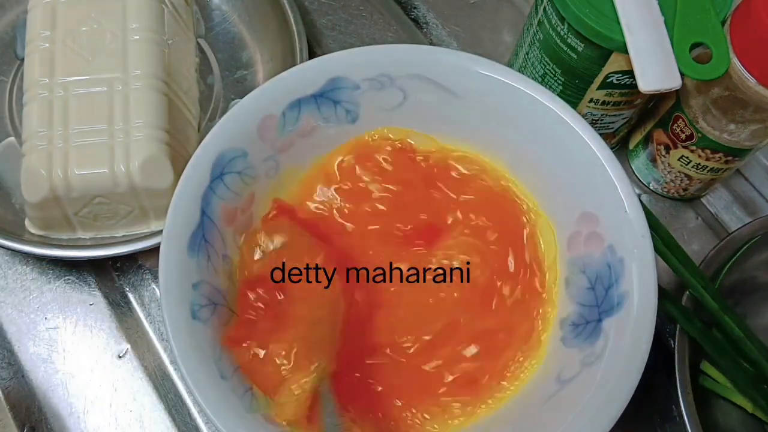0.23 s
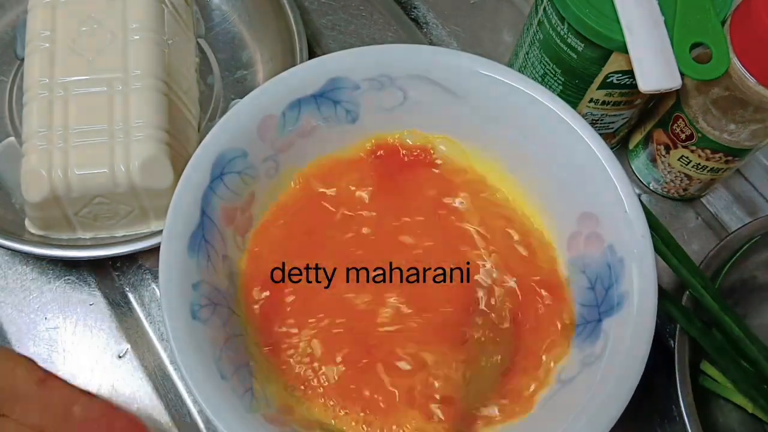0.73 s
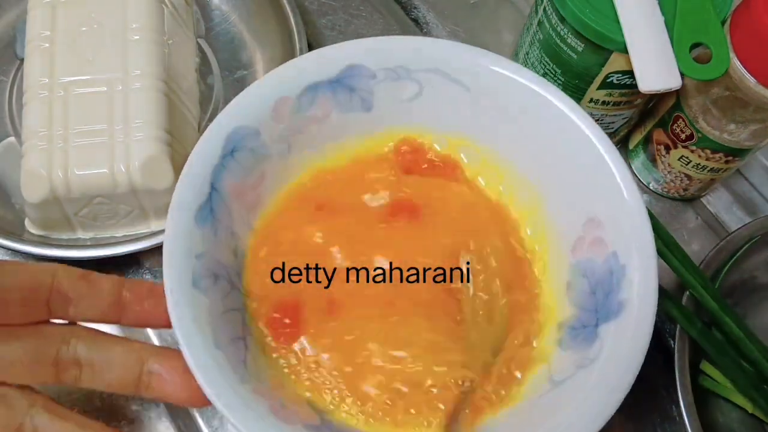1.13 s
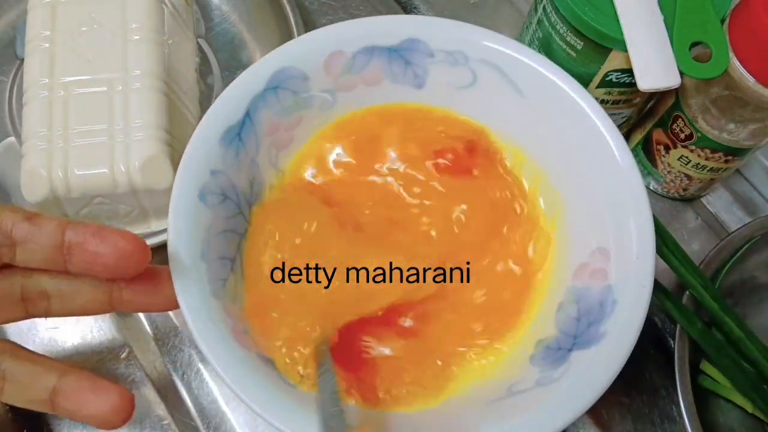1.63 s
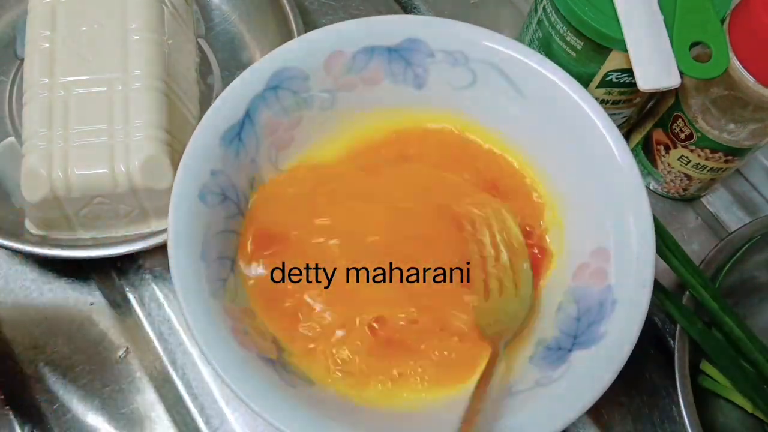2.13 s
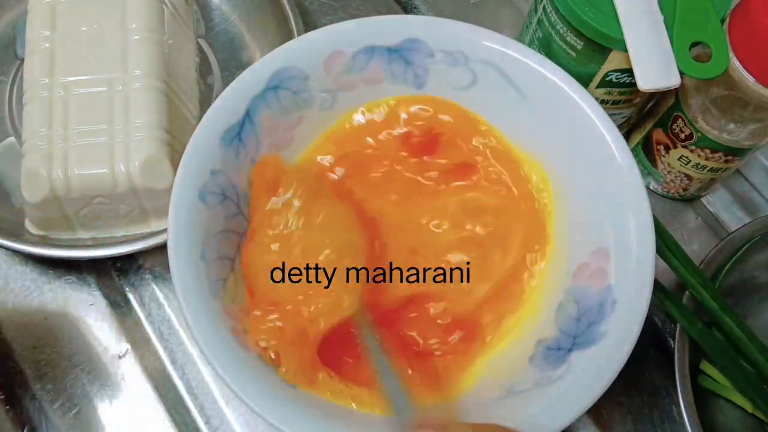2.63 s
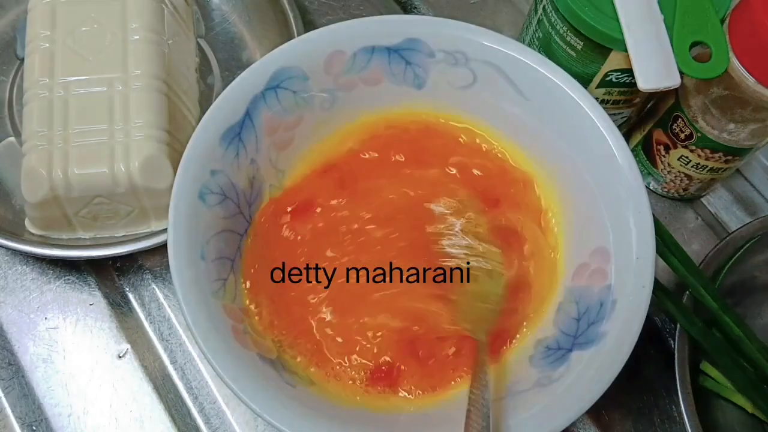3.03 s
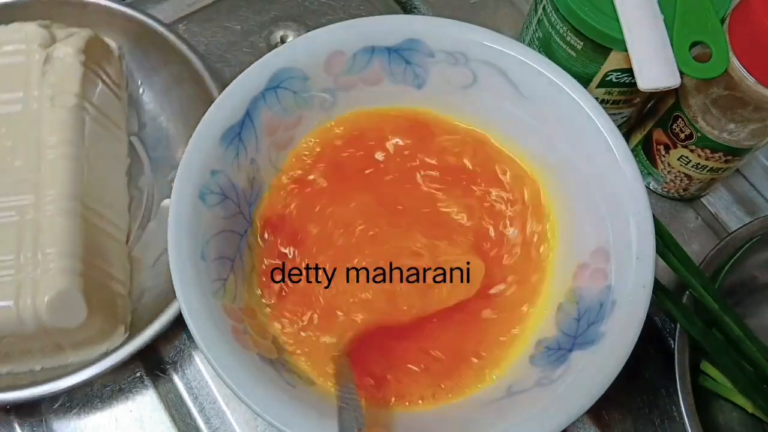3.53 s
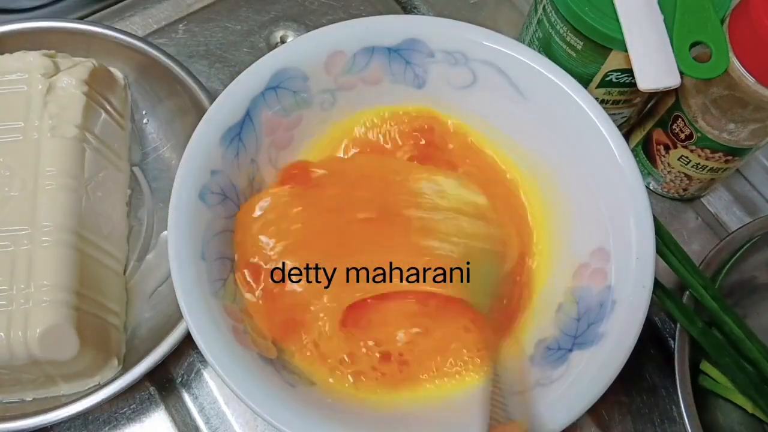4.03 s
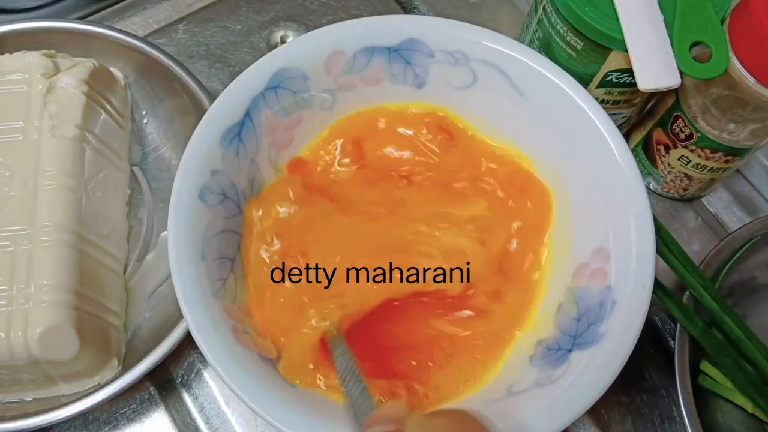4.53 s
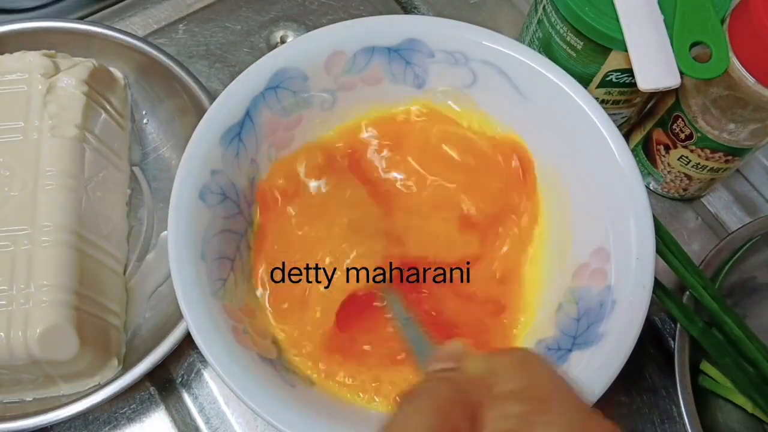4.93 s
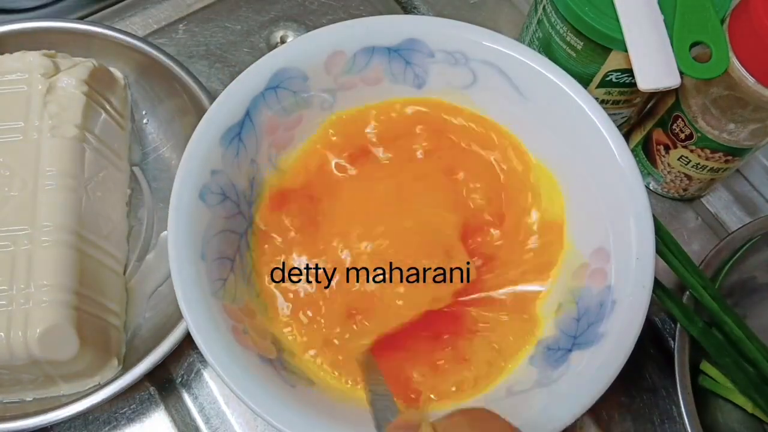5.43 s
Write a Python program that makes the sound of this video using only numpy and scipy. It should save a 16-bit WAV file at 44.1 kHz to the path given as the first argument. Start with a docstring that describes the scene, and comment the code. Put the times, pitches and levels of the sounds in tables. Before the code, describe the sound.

Raw eggs are beaten with a metal fork in a ceramic bowl, heard closely in mono in a small kitchen with short reflections. The first 0.4 s is soft squelching and faint taps; a strong wet knock with a hollow plop lands at 0.5 s, another at 0.7 s. From about 1 to 1.7 s the strokes become light and quiet. By 1.9 s the beating builds to around five hard strokes a second, each a damped mid-pitched knock with thin metallic ticks and short ceramic ring, followed about 45 ms later by a slap and descending gulps. A gap near 3.2-3.4 s breaks the run. Tines drag at 3.5 and 3.7 s, then sharper clacks, pops and dense squelching continue, with less airy hiss after strokes. A sharp pop comes at 5.4 s; beating continues to the end near 5.7 s. Soft low counter thuds and faint background hiss lie underneath.

```python
"""A fork beats raw eggs in a ceramic bowl on a steel sink top, about five strokes a second.
It starts softly, beats harder, eases off around 1 to 1.7 s, then beats hard; late on, the hiss after strokes is quieter.
In each stroke the fork knocks on the egg-damped wall and its tines tick, from noise pushes and gliding notes.
Flung egg then often slaps back and gulps; short swelling notes plop or fill out a hit, and tines at times drag.
Bubble notes squelch and fizz with the vigour, filtered noise thuds in the counter, a small kitchen answers."""
import sys
import numpy as np
from scipy import signal
from scipy.fft import rfft, irfft
from scipy.io import wavfile
from scipy.ndimage import uniform_filter1d

SR = 44100
rng = np.random.default_rng(int(sys.argv[2]) if len(sys.argv) > 2 else 0)


def store_wav(level_fs):
    """Save 16-bit WAV to argv[1]."""
    pcm = np.round(np.clip(np.atleast_2d(level_fs), -1, 1) * 32767)
    wavfile.write(sys.argv[1], SR, pcm.T.astype(np.int16))


N = 251370  # length [samples]

# modes of the bowl, the fork and the sink top: (frequency [Hz], level [dB])
RING = [(958, -4), (1011, -1), (1070, -2), (1156, -2), (1295, -5), (1420, -5), (1481, 0), (1533, 2),
        (1597, -2), (1683, -3), (1741, -2), (1808, -2), (1971, -1), (2104, -2), (2242, -5), (2564, -3),
        (2930, -5), (4618, 1), (4800, -3), (6090, -4), (6670, -1)]
# colour of the sharp clack of a hit: (frequency [Hz], level [dB])
CLACK = [(1500, -17.5), (2200, 7), (2570, 8), (3100, 3), (3600, -7.5), (4200, -18), (5500, -25.5)]
# colour of the fork's tines: (frequency [Hz], level [dB])
TINES = [(2500, -24.5), (3900, -12.5), (4680, 1.5), (5400, -6.5), (6100, -1), (6620, 1), (7050, -6),
         (7700, -10), (8500, -19.5), (9500, -24), (10200, -17.5), (11500, -39.5), (13800, -40),
         (15300, -27.5)]
# the fork meets the bowl: (time [s], wall knock level [dB], knock pitch [Hz], hollow bowl note level [dB],
# sharp clack level [dB], tine tick level [dB], tick pitch [Hz])
STROKES = [(0.004, -50, 1450, -66, -54.5, -58.5, 6300), (0.2862, -57, 1150, -54, -68, -56.5, 5200),
           (0.3228, -40, 1810, -50, -52, -48, 5680), (0.514, -19.5, 1650, -39, -49, -38.5, 4570),
           (0.7246, -30, 1693, -51.5, -49, -46, 5960), (0.9207, -38.5, 1510, -60, -62, -58, 5060),
           (1.118, -40, 1735, -49.5, -61, -51, 5400), (1.3399, -40, 1480, -56.5, -70, -62.5, 5670),
           (1.529, -52.5, 1440, -62.5, -71, -68.5, 6550), (1.7244, -33.5, 1590, -48.5, -61, -45.5, 6540),
           (1.9269, -24.5, 1653, -41.5, -54, -43, 6380), (2.1292, -20, 1567, -41.5, -59, -35.5, 5020),
           (2.3302, -26, 1320, -35.5, -39.5, -28.5, 5460), (2.53, -22, 1530, -42, -30, -39.5, 5870),
           (2.7164, -22, 1906, -40.5, -34, -27.5, 6500), (2.9003, -22, 1760, -25, -26.5, -29.5, 6820),
           (3.0915, -31.5, 1430, -33, -36.5, -43, 6300), (3.4842, -23.5, 1490, -24.5, -42.5, -40.5, 6530),
           (3.6784, -22.5, 1626, -29.5, -34.5, -41, 6500), (3.7844, -25, 1200, -51, -29, -36.5, 4590),
           (3.8081, -27, 2040, -25, -33.5, -55, 4200), (4.0774, -17.5, 1565, -26, -39, -52.5, 6600),
           (4.2889, -18.5, 1710, -56, -29, -36, 5200), (4.4797, -24.5, 1730, -37, -32.5, -27, 4570),
           (4.677, -25.5, 1600, -37, -30.5, -35.5, 4320), (4.8501, -24.5, 1774, -43.5, -28.5, -32.5, 6660),
           (5.0399, -20, 1590, -44, -37.5, -38, 5960), (5.3987, -26.5, 1790, -42.5, -47, -48, 6100),
           (5.5927, -31.5, 1660, -42.5, -47, -40, 5950)]

RING_T60 = 0.2  # seconds for the ringing to fall by 60 dB
TAIL_T = np.arange(int(0.35 * SR)) / SR
BINS = np.fft.rfftfreq(2048, 1 / SR)  # frequencies of the short pulses [Hz]


def amp(db):
    """Turns decibels into a linear gain."""
    return 10 ** (np.asarray(db) / 20)


# one decaying complex wave for each mode
RING_WAVES = np.array([amp(db - 60 * TAIL_T / RING_T60) * np.exp(2j * np.pi * hz * TAIL_T)
                       for hz, db in RING])


def unit(x):
    """Scales to rms 1."""
    return x / np.sqrt(np.mean(x ** 2) + 1e-20)


def at_level(x, db):
    """Sets the rms of the first 30 ms of a blow."""
    start = x[:int(0.03 * SR)]
    return amp(db) * x / np.sqrt(np.mean(start ** 2) + 1e-20)


def add(mix, s, sound):
    """Lays a sound into the mix at s seconds, cut off at the end of the mix."""
    part = mix[max(round(s * SR), 0):][:len(sound)]
    part += sound[:len(part)]


def read(points, hz):
    """A spectrum joined by straight lines on a log-frequency axis."""
    f, db = np.transpose(points)
    return np.interp(np.log(hz + 1), np.log(f), db)


def band(points):
    """A spectrum on BINS that falls by a further 30 dB per octave beyond its end points."""
    hz = BINS + 20
    octaves_below = np.maximum(np.log2(points[0][0] / hz), 0)
    octaves_above = np.maximum(np.log2(hz / points[-1][0]), 0)
    return np.maximum(read(points, BINS) - 30 * (octaves_below + octaves_above), -110)


def click(db):
    """The shortest causal (minimum-phase) pulse that has the given spectrum on BINS."""
    log_gain = np.log(amp(np.r_[db, db[-2:0:-1]]))
    return np.fft.ifft(np.exp(np.conj(signal.hilbert(log_gain)))).real


def tint(x, points):
    """Colours a long sound; rms 1."""
    gain = amp(read(points, np.fft.rfftfreq(N, 1 / SR)))
    return unit(irfft(rfft(x) * gain, N))


def kitchen(wet_db, ring_db, hold=0.021, t60=0.13, late_db=-29, late_t60=0.16, gap=0.00089):
    """Direct sound, close reflections that hold briefly and die, and the ring of bowl and sink top."""
    early_fade = amp(-60 * np.maximum(TAIL_T - hold, 0) / t60)
    late_fade = amp(late_db - 60 * TAIL_T / late_t60)
    onset = np.clip(TAIL_T / gap - 0.5, 0, 1)
    tail = rng.standard_normal(len(TAIL_T)) * (early_fade + late_fade) * onset
    # each response draws random phases and nearly equal levels for the modes
    shares = rng.uniform(0.94, 1.0, len(RING)) * np.exp(2j * np.pi * rng.random(len(RING)))
    ring = (shares @ RING_WAVES).real
    response = amp(wet_db) * tail / np.linalg.norm(tail) + amp(ring_db) * ring / np.linalg.norm(ring)
    response[0] += 1  # the direct sound
    return response


def heard(sound, room, db):
    """A blow in the room, set to the rms of its first 30 ms."""
    return at_level(signal.fftconvolve(sound, room), db)


def hump(time):
    """A level that swells to 1 after the given time and dies away."""
    u = np.arange(int(0.4 * SR)) / SR / time
    return u * np.exp(1 - u)


def pocket(hz, swell, glide):
    """A short note that swells and bends upward, as air trapped in the egg does."""
    u = np.arange(int(8 * swell * SR)) / SR / swell
    turns = np.cumsum(hz * (1 + glide * np.tanh(u - 1))) / SR
    return (u * np.exp(1 - u)) ** 2 * np.sin(2 * np.pi * turns)


def bubbles(per_s, low_hz, high_hz, cycles, ring_db, count=30):
    """Tiny bubbles and snapping films of many sizes, a few of them large; each swells over some cycles."""
    spread_db = 3.8  # scale of the random rise in level
    out = np.zeros(N)
    for hz in np.geomspace(low_hz, high_hz, count):
        note = hz * pocket(hz, cycles / hz, glide=0.061)
        births = rng.integers(0, N, (round(per_s * N / SR / count), 1))
        size = amp(spread_db * np.minimum(rng.exponential(1, births.shape), 4))
        places = births + np.arange(len(note))
        out += np.bincount(places.ravel(), (size * note).ravel(), N)[:N]
    return unit(signal.fftconvolve(out, kitchen(wet_db=-0.5, ring_db=ring_db))[:N])


def vigour():
    """How hard the egg is stirred at every sample, in dB."""
    # pace of the beating: (time [s], level against the usual pace [dB])
    pace = [(0, 2), (0.28, -10.5), (0.62, 7), (0.82, -0.5), (1.05, -11.5), (1.43, -6), (1.68, -25.5),
            (1.88, -6.5), (2.1, -0.5), (3.1, 2), (3.45, -13.5), (3.56, 3.5), (3.85, 4.5), (4.03, -2),
            (4.5, 3.5), (4.88, 10), (5.32, -2.5), (5.7, 1.5)]
    return np.interp(np.arange(N) / SR, *np.transpose(pace))


def hiss():
    """Steady faint background noise, coloured."""
    # colour of the noise: (frequency [Hz], level [dB])
    noise_colour = [(30, -3.5), (110, -8.5), (250, -7), (700, 4.5), (1800, -13.5), (3700, -18.5),
                    (6000, -2), (8200, -28), (13800, -20.5), (14600, -9), (15600, -2.5)]
    return amp(-72.5) * tint(rng.standard_normal(N), noise_colour)


def counter():
    """The rocking bowl makes the sink top rumble; each stroke adds the power of a soft thud."""
    # colour of the sink top: (frequency [Hz], level [dB])
    counter_colour = [(20, -32), (45, -13.5), (70, -5.5), (87, -3), (108, 4.5), (135, -4), (160, -2),
                      (185, -7.5), (240, -14), (400, -14), (900, -51)]
    # course of the rumble: (time [s], level [dB])
    rumble_course = [(0.0, -56), (0.32, -58.5), (0.65, -49.5), (1.68, -67.5), (1.79, -50), (3.06, -49),
                     (3.13, -47.5), (3.41, -64.5), (3.49, -50.5), (4.98, -49.5), (5.14, -44.5), (5.36, -57),
                     (5.41, -49.5), (5.7, -50.5)]
    rumble_db = -1.5  # rumble between thuds, against that course
    thud_db, thud_swell_s = 3.5, 0.041  # thud against the rumble, time to its top
    power = np.ones(N)
    for s, *_ in STROKES:
        add(power, s, (amp(thud_db) * hump(thud_swell_s)) ** 2)
    level = amp(rumble_db + np.interp(np.arange(N) / SR, *np.transpose(rumble_course)))
    return tint(rng.standard_normal(N), counter_colour) * level * np.sqrt(power)


def spray():
    """Tiny droplets and bursting froth hiss just after each stroke."""
    # colour of the spray: (frequency [Hz], level [dB])
    spray_colour = [(7000, -20), (9000, 6), (10300, -8.5), (11700, -9), (13800, -6), (14700, 6),
                    (15600, 5.5)]
    base_db, follow, swell_s = -44.5, 0.61, 0.032  # level for a 0 dB tick, dB per dB of tick, time to top
    # the hiss after a stroke is louder where its tick is higher
    db_per_octave, tick_ref_hz = 13, 5600
    late_s, late_db = 3.6, -10  # from here on the hiss after each stroke is quieter
    level = np.zeros(N)
    for s, *_, tick_db, tick_hz in STROKES:
        db = base_db + follow * tick_db + db_per_octave * np.log2(tick_hz / tick_ref_hz)
        if s > late_s:
            db += late_db
        add(level, s, amp(db) * hump(swell_s) ** 2)
    froth = bubbles(per_s=4000, low_hz=8000, high_hz=15000, cycles=1.5, ring_db=-30, count=10)
    return level * tint(froth, spray_colour)


def churn():
    """Hard beating folds in larger bubbles, which gurgle between the strokes and set the bowl ringing."""
    # colour of the gurgle: (frequency [Hz], level [dB])
    churn_colour = [(700, -22), (1100, 6), (1600, 1.5), (1900, -3.5), (2600, -11.5), (4000, -35.5)]
    churn_db, follow = -57.5, 1.8  # level at the usual pace, dB per dB of vigour
    gurgle = bubbles(per_s=400, low_hz=950, high_hz=2300, cycles=4, ring_db=-2, count=14)
    return tint(gurgle, churn_colour) * amp(churn_db + follow * vigour())


def egg():
    """The stirred egg squelches and fizzes with the vigour of the beating, and surges at each stroke."""
    # colours of the low squelch and the high fizz: (frequency [Hz], level [dB])
    squelch_colour = [(150, -27), (300, -4), (480, 0), (570, 4), (660, 4.5), (820, -1), (1150, -4),
                      (1600, -8), (2100, -5), (2500, -13.5), (3100, -3), (4500, -34.5)]
    fizz_colour = [(2000, -12.5), (3000, -0.5), (3700, 5), (4700, 3.5), (6600, 0), (8000, -9.5),
                   (11000, -42), (15000, -52.5)]
    surge_lag_s, surge_width_s = 0.0079, 0.038  # the egg moves fastest around each stroke
    squelch_db, squelch_surge_db = -51.5, 5.5  # level at the usual pace, lift at each stroke
    fizz_db, fizz_follow, fizz_surge_db = -67.5, 0.92, 2.5  # level, dB per dB of vigour, lift at each stroke
    ring_db = -12  # how much the stirring sets the bowl ringing
    t = np.arange(N) / SR
    surge = sum(np.maximum(1 - ((t - s - surge_lag_s) / surge_width_s) ** 2, 0) for s, *_ in STROKES)
    low = bubbles(per_s=800, low_hz=230, high_hz=2700, cycles=2.5, ring_db=ring_db)
    high = bubbles(per_s=2500, low_hz=2200, high_hz=13000, cycles=1.8, ring_db=ring_db)
    squelch_level = amp(squelch_db + vigour() + squelch_surge_db * surge)
    fizz_level = amp(fizz_db + fizz_follow * vigour() + fizz_surge_db * surge)
    return tint(low, squelch_colour) * squelch_level + tint(high, fizz_colour) * fizz_level


def scrapes():
    """Dragged tines catch on the glaze in a dense run of tiny slips."""
    # the tines drag over the glaze: (start [s], length [s], level [dB])
    drags = [(0.536, 0.057, -44), (3.486, 0.18, -44), (3.692, 0.17, -43), (4.885, 0.064, -54),
             (5.028, 0.091, -46.5), (5.202, 0.049, -58.5)]
    # colour of the scrape: (frequency [Hz], level [dB])
    scrape_colour = [(2000, -4.5), (3000, 8.5), (3600, -6.5), (4050, 5.5), (4500, -4.5), (5500, 1),
                     (6600, 0), (8000, -9), (11000, -37.5), (15000, -46.5)]
    rise_s, fade_db_per_s, release_s = 0.0079, 34, 0.01
    slips_per_s = 450
    t = np.arange(int(0.4 * SR)) / SR
    pressure = np.zeros(N)
    for s, length, db in drags:
        rise = np.minimum(t / rise_s, 1)
        release = np.exp(-np.maximum(t - length, 0) / release_s)
        add(pressure, s, rise * amp(db - fade_db_per_s * t) * release)
    slips = rng.standard_normal(N) * (rng.random(N) < slips_per_s / SR)
    in_room = signal.fftconvolve(slips, kitchen(wet_db=7.5, ring_db=-17))[:N]
    return pressure * tint(in_room, scrape_colour)


def plop(db, hz, swell):
    """A swelling note whose level wobbles slowly at random."""
    note = pocket(hz, swell, glide=0.035)
    smooth = uniform_filter1d(rng.standard_normal(len(note)), size=350)
    wobble = unit(uniform_filter1d(smooth, size=350))
    room = kitchen(wet_db=-3.5, ring_db=-25.0)
    return amp(db) * signal.fftconvolve(note * (1 + 0.3 * wobble), room)


def plops():
    """Short swelling notes, some alone and some giving body or a sharp pop to a hit."""
    # swelling notes: (time [s], level before wobble and room [dB], pitch [Hz], swell time [s])
    plop_notes = [(0.18, -37.5, 637, .01), (0.292, -38, 530, 0.011), (0.3, -41, 874, 0.012),
                  (0.332, -32, 895, 0.007), (0.479, -16, 561, 0.012), (0.487, -36, 870, .007),
                  (0.84, -43, 553, 0.01), (1.342, -41.5, 635, 0.014), (1.787, -35, 955, 0.0068),
                  (1.834, -38, 644, 0.0056), (1.984, -24.5, 714, .0052), (2.029, -26, 447, 0.0047),
                  (2.03, -23.5, 704, 0.0048), (2.177, -17.5, 630, 0.0046), (2.375, -17.5, 1010, 0.0048),
                  (2.515, -33, 2830, 0.0019), (2.916, -23.5, 904, 0.0028), (3.738, -21, 1064, 0.0096),
                  (3.808, -17.5, 1008, .0069), (3.81, -25.5, 568, .014), (3.818, -24, 2197, 0.0039),
                  (3.829, -29, 395, 0.005), (4.341, -14, 1205, 0.0024), (4.804, -29.5, 1203, 0.01),
                  (4.832, -19, 547, 0.0076), (4.948, -33, 634, .0069), (5.015, -17.5, 2250, .0016),
                  (5.092, -28, 1160, .0026), (5.369, -38.5, 1076, 0.019), (5.397, -9.5, 1790, 0.0019),
                  (5.638, -22, 1123, 0.0045)]
    out = np.zeros(N)
    for s, db, hz, swell in plop_notes:
        add(out, s, plop(db, hz, swell))
    return out


def contact(skid_db, skid_time, per_s=350):
    """A blow, followed by small catches as the tines skid along the glaze."""
    t = np.arange(int(0.08 * SR)) / SR
    catches = rng.standard_normal(len(t)) * (rng.random(len(t)) < per_s / SR)
    force = amp(skid_db) * catches * np.exp(-t / skid_time)
    force[0] = 1
    return force


def cushion(time):
    """The film of egg spreads a contact into a brief irregular push."""
    u = np.arange(int(7 * time * SR)) / SR / time
    return rng.standard_normal(len(u)) * (u * np.exp(-u)) ** 2


def blend(note, body, body_db):
    """A clear note with a wider sound under it, body_db in energy against the note."""
    out = np.zeros(int(0.15 * SR))
    add(out, 0, note)
    add(out, 0, amp(body_db) * body * np.linalg.norm(note) / np.linalg.norm(body))
    return out


def knock(hz, swell=0.0017, body_db=-8, gulp_db=-12, gulp_fall=0.31, count=2):
    """The wet fork smacks the wall with one strong note; smaller, deeper gulps follow as the egg closes."""
    # colour of the egg-damped wall: (frequency [Hz], level [dB])
    wall_colour = [(150, -42.5), (400, -23.5), (760, -11), (1020, -0.5), (1500, 8), (2050, 1),
                   (2400, -36.5), (3200, -32), (4500, -62.5)]
    gulp_time = 0.024  # latest gulp [s]
    body = signal.fftconvolve(contact(skid_db=-9, skid_time=0.02), click(band(wall_colour)))
    body = signal.fftconvolve(body, cushion(time=0.00061))
    out = blend(pocket(hz, swell, glide=0.0087), body, body_db)
    for late, size in rng.uniform(0.25, 1, (count, 2)):
        gulp = pocket(hz * (1 - gulp_fall * late), swell, glide=0.054)
        add(out, late * gulp_time, amp(gulp_db) * size * gulp)
    return out


def tick(points, hz, swell, splash_db, skid_db):
    """A short ping at the resonance that the contact favours, inside the wet splash of the skidding tines."""
    push = signal.fftconvolve(contact(skid_db, skid_time=0.011), cushion(time=0.0016))
    splash = signal.fftconvolve(push, click(band(points)))
    return blend(pocket(hz, swell, glide=0.0056), splash, splash_db)


def hollow(hz, swell=0.0041):
    """The bowl's low note, with a short plop of the slosh close to it."""
    t60 = 0.092  # seconds for the note to fall by 60 dB
    t = np.arange(int(0.2 * SR)) / SR
    note = np.sin(2 * np.pi * hz * t) * (1 - np.exp(-t / swell)) * amp(-60 * t / t60)
    slosh = pocket(hz * rng.uniform(0.95, 1.25), swell=0.004, glide=0.05)
    add(note, 0.002, amp(-9) * slosh)
    return note


def blow(wall_db, hz, bowl_db, clink_db, clack_db, tick_db, tick_hz, wet_db, ring_db):
    """Anything that hits the bowl sounds the wall, the ceramic, the tines and the hollow of the bowl."""
    # colour of the clinking ceramic: (frequency [Hz], level [dB])
    clink_colour = [(1700, -23), (1970, 2.5), (2110, -1.5), (2260, -17), (2500, -29)]
    out = np.zeros(int(0.5 * SR))
    room = kitchen(wet_db, ring_db)
    bright_room = kitchen(wet_db=6.0, ring_db=-12.5)
    bowl_room = kitchen(wet_db=2.5, ring_db=-16.5)
    clink = signal.fftconvolve(click(band(clink_colour)), cushion(time=0.00065))
    clack = tick(CLACK, rng.uniform(2560, 3237), swell=0.0011, splash_db=3.0, skid_db=-20.0)
    tines = tick(TINES, tick_hz, swell=0.001, splash_db=1.5, skid_db=-8.0)
    # the hollow note varies a little at random around 556 Hz
    note = hollow(556 * (1 + 0.023 * rng.standard_normal()))
    add(out, 0, heard(knock(hz), room, wall_db))
    add(out, 0, heard(clink, room, clink_db))
    add(out, 0, heard(clack, bright_room, clack_db))
    add(out, 0, heard(tines, bright_room, tick_db))
    add(out, 0, heard(note, bowl_room, bowl_db))
    return out


def gulps(db, hz, count=5):
    """The egg closes after a slap in an uneven run of gulps that sink and fade."""
    spacing_s, swell_s = 0.01, 0.0016  # mean wait for each gulp, time to its top
    first_db, pitch_share = -1, 0.834  # the first gulp, against its slap
    fade_db_per_s, octaves_per_s = 332.5, 7.6  # the following gulps get quieter and deeper
    out = np.zeros(int(0.15 * SR))
    delays = spacing_s * np.cumsum(rng.uniform(0.6, 1.4, count))
    for delay in delays:
        age = delay - delays[0]
        pitch = hz * pitch_share * 2 ** (-octaves_per_s * age) * rng.uniform(0.9, 1.1)
        level = amp(db + first_db - fade_db_per_s * age)
        add(out, delay, level * pocket(pitch, swell_s, glide=0.026))
    return signal.fftconvolve(out, kitchen(wet_db=-10.5, ring_db=-17))


def slaps():
    """The flung egg lands on the wall with a round pop, and gulps as it closes."""
    # landings, mostly some 45 ms after a stroke: (time [s], level [dB], pitch [Hz])
    landings = [(0.2071, -45.5, 1130), (0.3763, -39, 1330), (0.5611, -21.5, 1440), (0.6704, -39, 1225),
                (0.8627, -48, 1500), (1.768, -36, 1400), (1.9766, -24, 1333), (2.1747, -22, 1344),
                (2.3722, -19.5, 1390), (2.5626, -19, 1423), (2.7629, -24.5, 1490), (3.7407, -28, 1113),
                (4.125, -22, 1510), (4.3315, -21.5, 1410), (4.4558, -30.5, 1910), (4.5283, -19, 1680),
                (4.7074, -20.5, 1476), (4.895, -19, 1557), (4.9576, -31.5, 1450), (5.0148, -30.5, 1780),
                (5.1923, -39, 1920), (5.385, -44, 1780), (5.6354, -29, 1690)]
    bowl_db, clink_db, clack_db, tick_db = -26, -21, -21, -24.5  # the hard parts, against the slap itself
    out = np.zeros(N)
    for s, db, hz in landings:
        slap = blow(db, hz, db + bowl_db, db + clink_db, db + clack_db, db + tick_db,
                    tick_hz=4760, wet_db=-4.5, ring_db=-12.5)
        add(out, s, slap)
        add(out, s, gulps(db, hz))
    return out


def dips():
    """A soft wet touch as the fork enters the egg ahead of each stroke but the first."""
    lead_s, against_clack_db = 0.031, -19  # mean lead before the stroke, level against its clack
    out = np.zeros(N)
    for s, _, _, _, clack_db, _, _ in STROKES[1:]:
        start = s - lead_s * rng.uniform(0.75, 1.25)
        touch = signal.fftconvolve(click(band(CLACK)), cushion(time=0.002))
        add(out, start, heard(touch, kitchen(wet_db=1, ring_db=-3), clack_db + against_clack_db))
    return out


def fork():
    """Each stroke strikes the wall, with a faint swell of noise ahead; the place struck sets the pitches."""
    # the higher the knock, the barer the ceramic and the more it clinks
    clink_db_at_ref, clink_ref_hz, clink_db_per_octave = -14, 1593, 40.5
    # a faint soft noise swells in just before each hit and softens its attack
    lead_s, lead_db = 0.0047, -15  # start before the hit, level against its tick
    out = np.zeros(N)
    for s, wall_db, hz, bowl_db, clack_db, tick_db, tick_hz in STROKES:
        clink_db = wall_db + clink_db_at_ref + clink_db_per_octave * np.log2(hz / clink_ref_hz)
        soft_noise = signal.fftconvolve(click(band(TINES)), cushion(time=0.0093))
        add(out, s - lead_s, heard(soft_noise, kitchen(wet_db=-4.5, ring_db=-14), tick_db + lead_db))
        stroke = blow(wall_db, hz, bowl_db, clink_db, clack_db, tick_db, tick_hz, wet_db=3.5, ring_db=-9.5)
        add(out, s, stroke)
    return out


def scene():
    """Sums all layers, from the background to the fork, into one channel."""
    background = hiss() + counter()
    stirring = spray() + churn() + egg() + scrapes() + plops()
    beating = slaps() + dips() + fork()
    return (background + stirring + beating)[None]


def record(dry, ceiling=1.0):
    """The microphone rounds off the highest peaks; then a low-pass sets the band limit."""
    edge_hz = 15800
    rounded = dry / (1 + (dry / ceiling) ** 6) ** (1 / 6)
    low_pass = signal.firwin(511, edge_hz, window=("kaiser", 9), fs=SR)
    return signal.oaconvolve(rounded, low_pass[None], "same")


dry = scene()
out = record(dry)
store_wav(out)
```